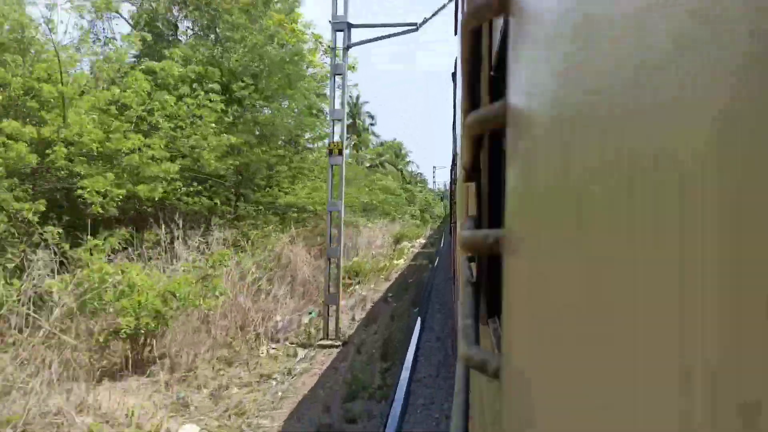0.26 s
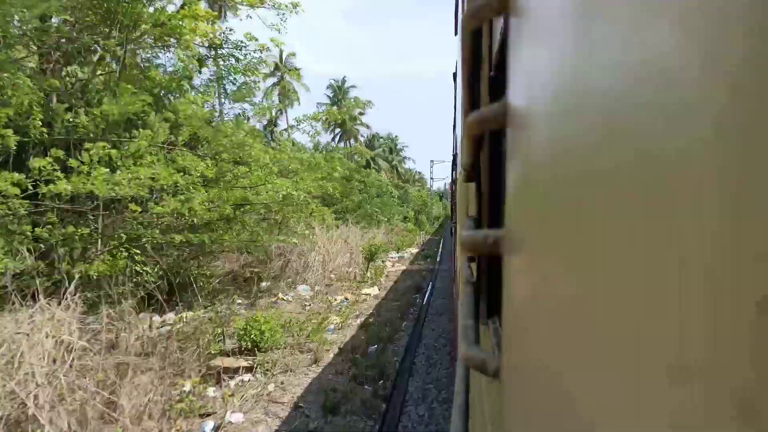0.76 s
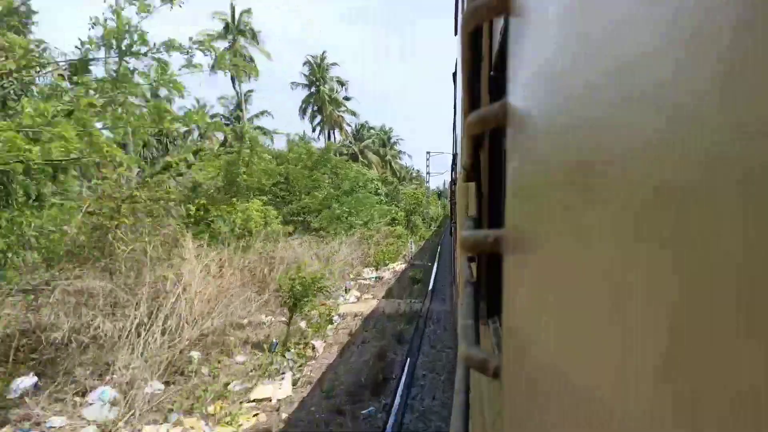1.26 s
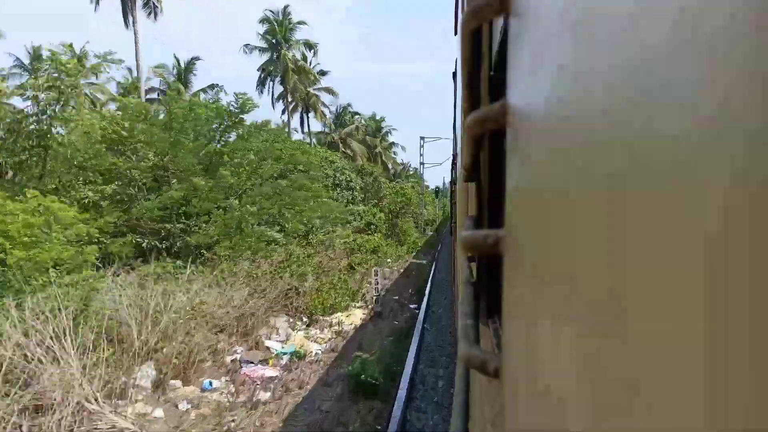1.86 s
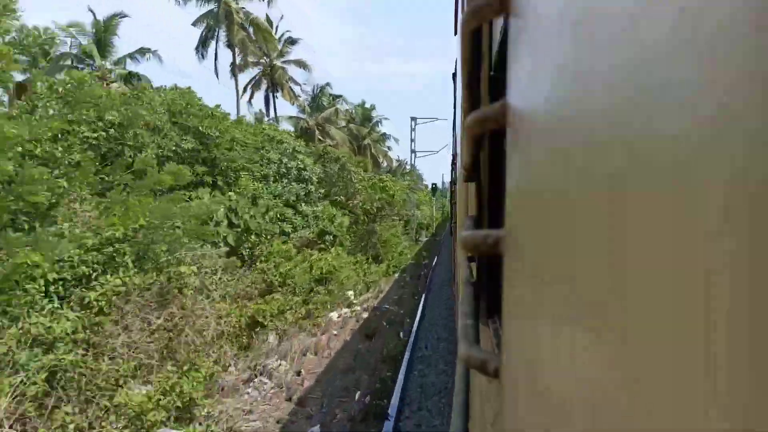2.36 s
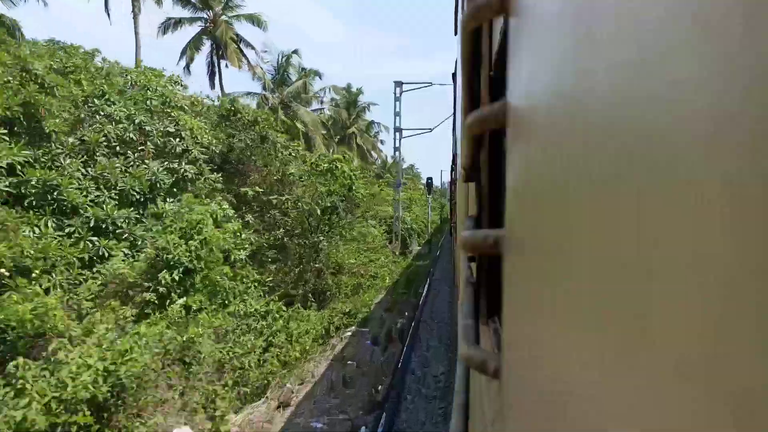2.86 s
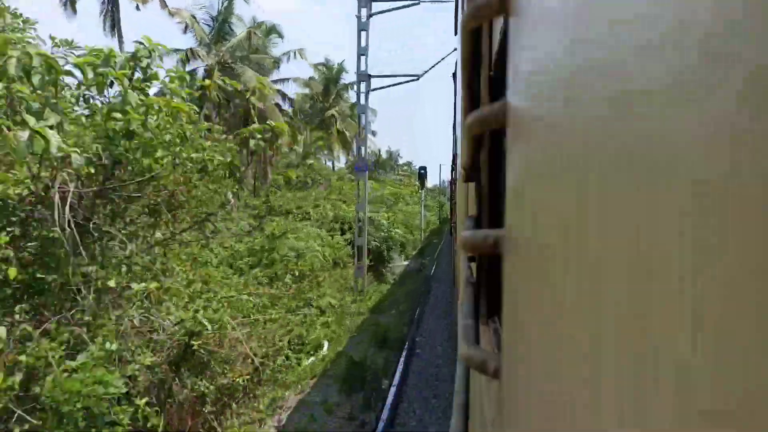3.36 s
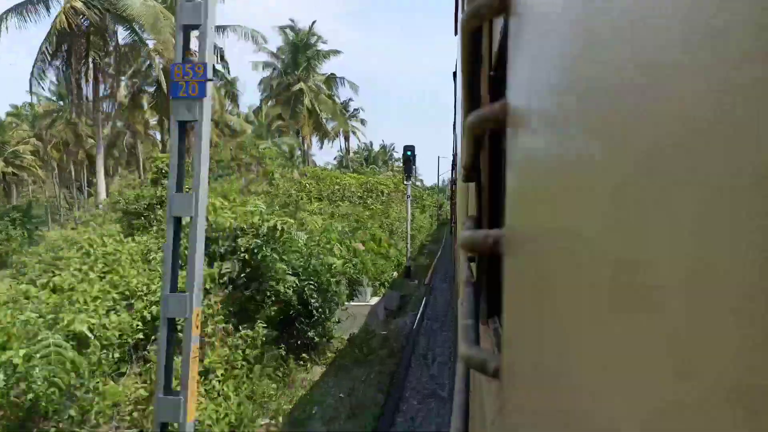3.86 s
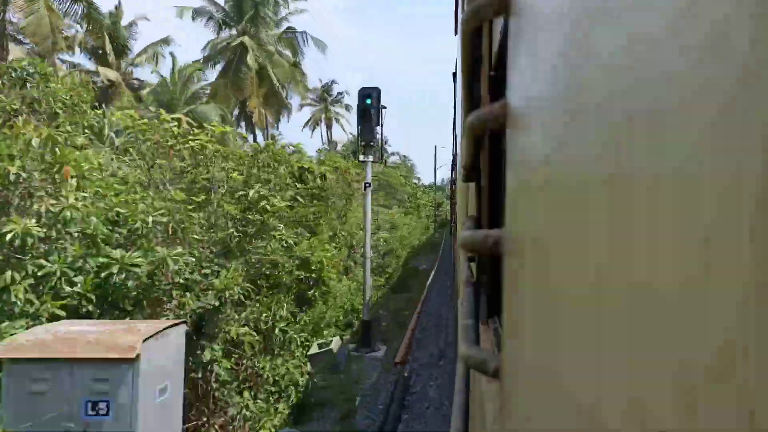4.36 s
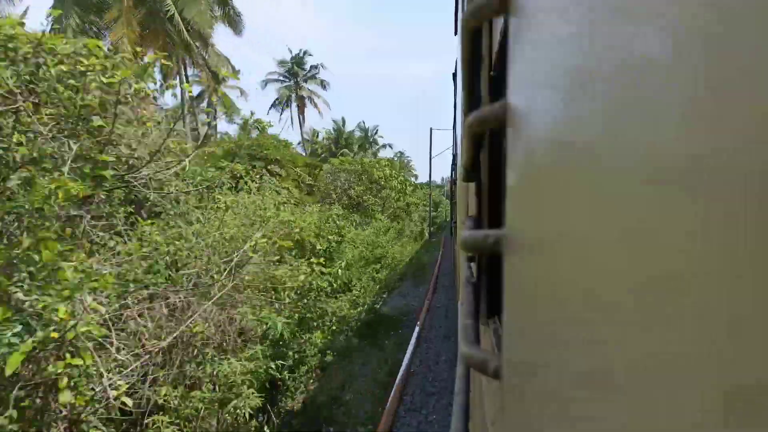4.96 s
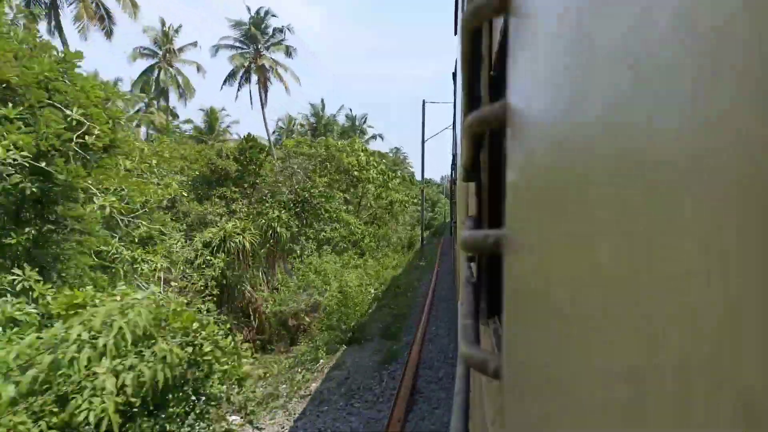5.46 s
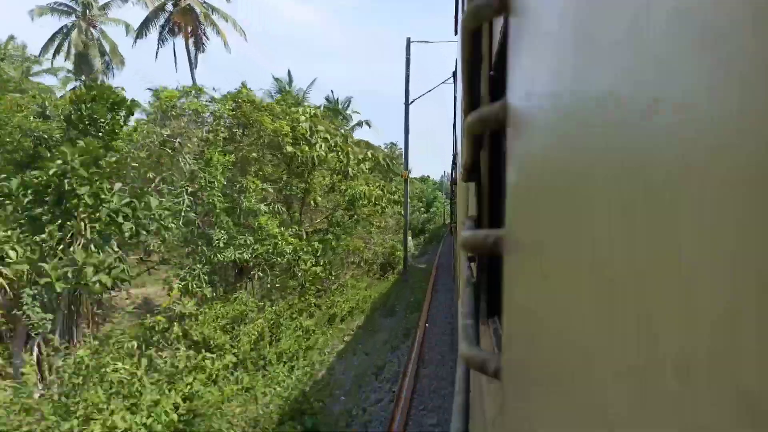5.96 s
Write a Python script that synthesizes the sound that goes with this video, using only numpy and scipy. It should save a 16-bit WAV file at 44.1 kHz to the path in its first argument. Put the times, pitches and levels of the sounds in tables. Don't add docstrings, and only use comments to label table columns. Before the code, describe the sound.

Heard from an open doorway of a speeding passenger coach: a thick low boom from floor and walls, grainy rail roar and soft wheel hiss. Axles hit rail joints in irregular thumps, often doubled, several each second, with dull clacks and loose steel rattles. A phone microphone thins the deepest bass and ducks at hard thumps, then the roar creeps back.

```python
import sys
import numpy as np
from scipy import signal
from scipy.fft import rfft, irfft, next_fast_len
from scipy.io import wavfile
from scipy.ndimage import uniform_filter1d, minimum_filter1d

SR = 44100
rng = np.random.default_rng(int(sys.argv[2]) if len(sys.argv) > 2 else 0)


def attenuation_scalar(level_db):
    decades = np.asarray(level_db, float) / 20
    return 10 ** decades


def materialize(psi):
    bounded = np.clip(np.atleast_2d(psi).T, -1, 1)
    quanta = np.round(bounded * 32767).astype(np.int16)
    wavfile.write(sys.argv[1], SR, quanta)


N = 273420
TIME_S = np.arange(N) / SR

# time in seconds, long-wave unevenness (boom) in dB, fine roughness (roar) in dB.
TRACK_STATE = [(0, 5.5, 1), (.25, 5.5, 1), (.75, 2.5, -1.5), (1.1, 4, -1.5), (1.5, 4.5, 2.5),
               (1.75, 0, 2.5), (2.1, 2, 1.5), (2.4, -2, -0.5), (2.8, 1, 0), (3.2, -2, -1), (3.55, 1.5, .5),
               (3.9, -2.5, -0.5), (4.25, 1.5, 0), (4.5, -0.5, 1), (5.05, 2.5, 0.5), (5.45, -0.5, -0.5),
               (5.7, 0, 3), (6.2, 2, 2.5)]
# frequency in Hz, density in dB per Hz.
BODY_COLOUR = [(35, -57.5), (60, -62.5), (95, -6.5), (135, 0), (172, -2.5), (209, -4), (274, -8.5),
               (308, -11), (435, -12), (489, -15.5), (657, -20), (1060, -20.5), (1300, -23.5),
               (1690, -56.5), (2860, -120)]
# frequency in Hz, density in dB per Hz.
WHEEL_COLOUR = [(1100, 5), (1300, 0.5), (1600, -5.5), (1800, -6.5), (2000, -4), (2300, -10), (2620, -8.5),
                (3000, -11), (3800, -13.5), (4000, -15.5), (4650, -15.5), (4900, -20), (5600, -18),
                (7000, -30)]
# frequency in Hz, density in dB per Hz.
AIR_COLOUR = [(4000, -2), (5000, 1.5), (5500, 2), (6050, -0.5), (6250, -4.5), (7000, -6.5), (7700, -9),
              (8300, -10), (8800, -13), (10000, -14), (12500, -16), (15000, -21), (15700, -19.5)]
# frequency in Hz, width in Hz, level in dB.
WHEEL_MODES = [(987, 143, -43.5), (1908, 85, -55), (2610, 78, -54), (5870, 450, -62), (15640, 220, -82.5)]
# drop in seconds, peak in dB, main ring in Hz,
# rebound lag in seconds, rebound level relative to the drop in dB.
JOINT_HITS = [(.423, -11.5, 159.4, .013, 2), (.467, -8, 186, .019, -5), (.639, -9.5, 201.4, .022, -0.5),
              (.838, -8.5, 206.6, .014, -3), (1.357, -9.5, 260, .035, -3.5),
              (1.512, -5.5, 185.1, .024, -5.5), (1.674, -7.5, 197.6, .018, -2.5),
              (2.038, -5, 159.2, .031, -10), (2.181, -6, 149.7, .029, -6.5), (2.635, -12.5, 182.4, .024, 7),
              (3.034, -7, 176, .019, -2.5), (3.119, -15, 201.3, .025, -1), (3.37, -10, 184.6, .016, -3.5),
              (3.8, -10, 154, .017, -11), (3.949, -12.5, 159.7, .019, 1), (4.035, -9.5, 241.7, .017, 2.5),
              (4.327, -12, 197.4, .022, 1.5), (4.805, -4.5, 167.2, .026, -6),
              (4.996, -6.5, 172.6, .016, -5.5), (5.065, -13.5, 199, .017, 2),
              (5.367, -6.5, 202.8, .018, -2.5), (5.663, -8, 167, .027, -2.5), (6.003, -12, 202, .025, 1.5)]
# time in seconds, peak in dB, main ring in Hz, length in seconds.
SINGLE_KNOCKS = [(.053, -12, 185.6, 0.021), (.15, -9, 208.3, .042), (.323, -13.5, 160, 0.015),
                 (.584, -10, 164, 0.028), (.708, -13.5, 173.7, .032), (.812, -7, 197.5, 0.01),
                 (1.133, -16, 184.7, 0.045), (1.291, -14, 206.6, 0.017), (1.823, -14, 214.6, 0.01),
                 (1.88, -13.5, 185, .025), (2.347, -12.5, 139.7, 0.031), (2.502, -10, 174, 0.0096),
                 (2.532, -8.5, 208.1, 0.013), (2.595, -10.5, 148, .025), (2.841, -15, 151.6, 0.01),
                 (2.88, -9.5, 194.7, 0.029), (3.292, -16, 149.4, 0.014), (3.345, -13, 193.8, 0.029),
                 (3.51, -7, 190, 0.015), (3.682, -14.5, 203.7, .016), (4.012, -8, 199.3, 0.029),
                 (4.17, -7.5, 197.8, 0.017), (4.43, -7, 162, .008), (4.469, -12, 148, 0.013),
                 (4.679, -11, 163.5, .038), (4.857, -11.5, 162.4, 0.022), (5.219, -2.5, 203, 0.022),
                 (5.83, -7.5, 186.7, .016), (5.887, -6, 162, 0.018), (6.141, -3, 172.3, 0.019)]
# ratio to the main ring, level in dB.
BOGIE_MODES = [(.7, -11.5), (1.0, -1.5), (1.329, -7.5), (1.85, -21.5), (2.5, -22.5)]
# frequency in Hz, density in dB per Hz.
AFTERRING_COLOUR = [(70, -20.5), (105, 0.5), (150, 2), (220, 1.5), (320, -13)]
# frequency in Hz, density in dB per Hz.
STEEL_COLOUR = [(300, 0), (450, 0.5), (620, 0), (740, -4), (860, -3.5), (1130, -7.5), (1300, -17.5),
                (2080, -20), (4000, -37)]
# time in seconds, level in dB, length in seconds.
CLATTER_HITS = [(0.151, -27, 0.055), (0.325, -30, 0.038), (1.361, -22, 0.022), (1.393, -27, 0.033),
                (2.181, -30.5, 0.034), (2.602, -31, .022), (3.125, -25.5, .03), (3.297, -26, .014),
                (3.36, -22, 0.06), (3.682, -32, 0.034), (3.786, -26.5, 0.034), (3.955, -35, .025),
                (4.025, -20, .012), (4.052, -28, 0.032), (4.173, -27, 0.038), (4.334, -30.5, 0.044),
                (4.409, -31, .025), (4.995, -19.5, 0.018), (5.065, -23.5, .03), (5.222, -25.5, 0.047),
                (5.367, -25.5, 0.033), (5.521, -30, 0.042), (5.644, -20.5, 0.058), (5.762, -16.5, 0.028),
                (5.802, -24, .025), (5.895, -22.5, 0.024), (5.989, -17.5, 0.019), (6.005, -21.5, 0.031),
                (6.049, -25.5, 0.038), (6.134, -25.5, 0.016)]
# frequency in Hz, level in dB.
CHARGER_LINES = [(6445, -73), (6627, -68), (7779, -76), (7957, -71), (8043, -83.5), (8220, -77.5),
                 (15664, -86), (15730, -85.5)]
# time in seconds, gain after the snap in dB, wait in seconds.
GAIN_SNAPS = [(0.0, -1.5, 0.089), (0.161, -4.5, 0.091), (0.465, -2.5, 0.0), (0.837, -4.5, 0.15),
              (1.359, -1.8, 0.3), (1.511, -7.5, 0.24), (1.68, -5.5, 0.099), (2.027, -0.5, 0.083),
              (2.179, -1, 0.13), (2.636, 3.5, 0.13), (2.882, -2.1, 0.053), (3.03, 1, 0.084),
              (3.369, 1.3, 0.27), (3.507, -6, 0.17), (3.68, -4.5, 0.034), (4.021, 3, 0.11),
              (4.171, -1.2, 0.15), (4.33, 1.0, 0.13), (4.803, 2.5, 0.18), (4.995, 0, 0.22),
              (5.208, -6.5, 0.34), (5.37, -6.5, 0.14), (5.661, 0.2, 0.053), (5.828, -0.7, 0.075),
              (5.89, -1.5, 0.077), (6.025, -2, 0.3), (6.147, -6, 0.11)]
# time in seconds, gain in dB.
GAIN_TARGET = [
    (0, 1.4),
    (.8, 2),
    (1.3, 2.5),
    (2, 3),
    (2.5, 7),
    (3.2, 6.5),
    (6.2, 7.5),
]

FLOOR_DB, WALL_DB, RAIL_DB, WHEEL_DB, AIR_DB = -24, -29, -34, -39.5, -56.5
WALL_DB_PER_DB, RAIL_DB_PER_DB, WHEEL_DB_PER_DB = 1, 1.57, 0.67
DROP_S, REBOUND_S = 0.013, 0.016
RISE, FALL, CLATTER_RISE = 0.55, 0.83, 0.33
LEAD_S, BLOW_WINDOW_S = 1 / 10, 1 / 4
AFTERRING_DB, AFTERRING_S = -10, 0.031
CLACK_DB, CLACK_STRETCH = -35.5, 1.5
BUFFET_DB = -66
RECOVER_S, EASE_S, SNAP_S = 0.094, 0.033, 0.0037
BASS_CUT_HZ, CEILING = 24, 0.59
BLOW_T_S = TIME_S[:int(BLOW_WINDOW_S * SR)]


def walk(rate_hz):
    k = int(SR / rate_hz)
    held = np.repeat(rng.standard_normal(N // k + 1), k)
    slewed = uniform_filter1d(uniform_filter1d(held, k), k)
    return 1.4 * (slewed - uniform_filter1d(held, 7 * k))[:N]


def hiss(colour, lo_hz, hi_hz, flicker_db, rate_hz, shared_db=0):
    size = next_fast_len(N)
    octave = np.log2(np.maximum(np.fft.rfftfreq(size, 1 / SR), 1))
    hz, db = np.transpose(colour)
    noise = rfft(rng.standard_normal(size)) * attenuation_scalar(np.interp(octave, np.log2(hz), db))
    out = 0
    for centre in np.arange(np.log2(lo_hz), np.log2(hi_hz), 1 / 3):
        band = np.clip(1 - 3 * abs(octave - centre), 0, 1)
        out = out + irfft(noise * band, size)[:N] * attenuation_scalar(flicker_db * walk(rate_hz))
    out = out * attenuation_scalar(shared_db)
    return out / np.std(out)


def rolling():
    s, boom_db, roar_db = np.transpose(TRACK_STATE)
    boom_db, roar_db = np.interp(TIME_S, s, boom_db), np.interp(TIME_S, s, roar_db)
    shake = walk(30)
    floor = hiss(BODY_COLOUR, 23.64, 240, flicker_db=0.55, rate_hz=16, shared_db=shake)
    wall = hiss(BODY_COLOUR, 280.4, 480, flicker_db=2.4, rate_hz=9.9, shared_db=0.85 * shake)
    rail = hiss(BODY_COLOUR, 544, 1200, flicker_db=1.0, rate_hz=18, shared_db=1.1 * shake)
    wheel = hiss(WHEEL_COLOUR, 1440.5, 4597, flicker_db=0.5, rate_hz=24, shared_db=0.64 * shake)
    air = hiss(AIR_COLOUR, 5600, 18000, flicker_db=0.6, rate_hz=28, shared_db=0.75 * shake)
    out = attenuation_scalar(FLOOR_DB + boom_db) * floor
    out += attenuation_scalar(WALL_DB + WALL_DB_PER_DB * boom_db) * wall
    out += attenuation_scalar(RAIL_DB + RAIL_DB_PER_DB * roar_db) * rail
    out += attenuation_scalar(WHEEL_DB + WHEEL_DB_PER_DB * roar_db) * wheel
    return out + attenuation_scalar(AIR_DB) * air


def wheel_rings():
    s, _, roar_db = np.transpose(TRACK_STATE)
    out = 0
    for hz, width_hz, db in WHEEL_MODES:
        b, a = signal.iirpeak(hz, hz / width_hz, fs=SR)
        hum = signal.lfilter(b, a, rng.standard_normal(N))
        out = out + attenuation_scalar(db + 1.7 * walk(3.42)) * hum / np.std(hum)
    return out * attenuation_scalar(0.61 * np.interp(TIME_S, s, roar_db))


def swell(length_s, rise=RISE):
    t = BLOW_T_S - LEAD_S
    return np.exp(-(t / (length_s * np.where(t < 0, rise, FALL))) ** 2)


def blows():
    detune = 1 + 0.07 * rng.standard_normal(len(JOINT_HITS))
    hits = list(SINGLE_KNOCKS)
    for (s, db, hz, lag_s, rel_db), ratio in zip(JOINT_HITS, detune):
        hits.append((s, db, hz, DROP_S))
        hits.append((s + lag_s, db + rel_db, hz * ratio, REBOUND_S))
    return hits


def joints(steel, gain_db):
    lead, n = int(LEAD_S * SR), len(BLOW_T_S)
    out = np.zeros(N + SR)
    floor = np.tile(hiss(AFTERRING_COLOUR, 89.5, 260, flicker_db=1.0, rate_hz=22), 2)
    since = np.maximum(BLOW_T_S - LEAD_S, 0) / AFTERRING_S
    fading = attenuation_scalar(AFTERRING_DB) * since * np.exp(1 - since * 2)
    for s, peak_db, hz, length_s in blows():
        i = int(s * SR)
        thump = 0
        for ratio, db in BOGIE_MODES:
            phase = 2 * np.pi * rng.random()
            thump = thump + attenuation_scalar(db) * np.sin(2 * np.pi * hz * ratio * BLOW_T_S + phase)
        body = thump * swell(length_s) + floor[i:i + n] * fading
        clack = attenuation_scalar(CLACK_DB) * steel[i:i + n] * swell(CLACK_STRETCH * length_s)
        true_db = peak_db - gain_db[i + SR // 200]
        out[i:i + n] += attenuation_scalar(true_db) * body + clack
    return out[lead:lead + N]


def clatter(steel, gain_db):
    lead, n = int(LEAD_S * SR), len(BLOW_T_S)
    out = np.zeros(N + SR)
    for s, db, length_s in CLATTER_HITS:
        i = int(s * SR)
        rattle = steel[N - i:N - i + n] * swell(length_s, CLATTER_RISE)
        out[i:i + n] += attenuation_scalar(db - gain_db[i]) * rattle
    return out[lead:lead + N]


def whine():
    out = 0
    for hz, db in CHARGER_LINES:
        level = attenuation_scalar(db - 1.5 + 1.5 * walk(4))
        out = out + level * np.sin(2 * np.pi * np.cumsum(hz + 5 * walk(9)) / SR)
    return out


def buffet():
    sos = signal.butter(4, 62, fs=SR, output="sos")
    rumble = signal.sosfilt(sos, rng.standard_normal(N))
    return attenuation_scalar(BUFFET_DB) * rumble / np.std(rumble)


def phone_gain_db():
    s, after_db, wait_s = np.transpose(GAIN_SNAPS)
    last = np.maximum(np.searchsorted(s, TIME_S, "right") - 1, 0)

    def ease(late_s):
        return EASE_S * np.logaddexp(0, late_s / EASE_S)

    rising_s = ease(TIME_S - s[last] - wait_s[last]) - ease(-wait_s[last])
    target_db = np.interp(TIME_S, *np.transpose(GAIN_TARGET))
    gain_db = target_db - (target_db - after_db[last]) * np.exp(-rising_s / RECOVER_S)
    return uniform_filter1d(gain_db, size=int(SNAP_S * SR))


def scene():
    gain_db = phone_gain_db()
    steel = np.tile(hiss(STEEL_COLOUR, 305, 4000, flicker_db=2.5, rate_hz=44), 2)
    impacts = joints(steel, gain_db) + clatter(steel, gain_db)
    return (rolling() + wheel_rings() + impacts + whine() + buffet())[None]


def roll_off(x):
    return signal.sosfilt(signal.butter(12, 15910, fs=SR, output="sos"), x)


def record(dry):
    bass_cut = signal.butter(2, BASS_CUT_HZ, "high", fs=SR, output="sos")
    mix = signal.sosfilt(bass_cut, dry) * attenuation_scalar(phone_gain_db())
    room_left = minimum_filter1d(np.minimum(1, CEILING / (abs(mix) + 1e-9)), size=265)
    mix = mix * uniform_filter1d(room_left, size=133)
    treble_cut = signal.ellip(12, 0.3, 60, 15725, fs=SR, output="sos")
    mix = signal.sosfilt(treble_cut, mix)
    return roll_off(mix)


dry = scene()
out = record(dry)
materialize(out)
```